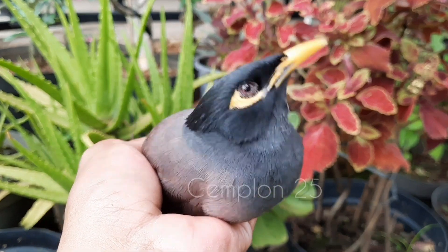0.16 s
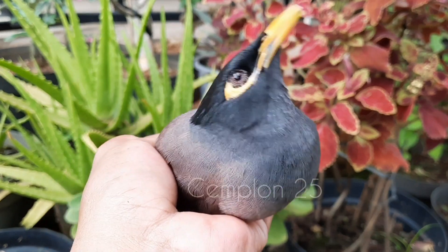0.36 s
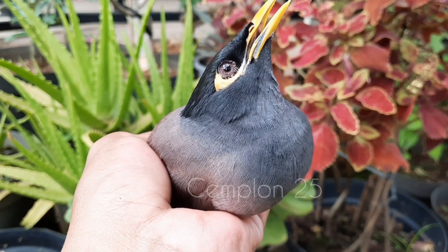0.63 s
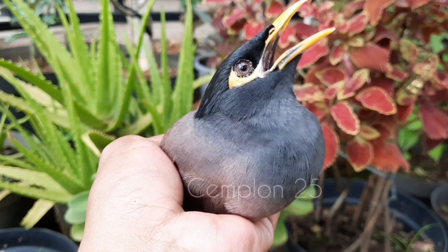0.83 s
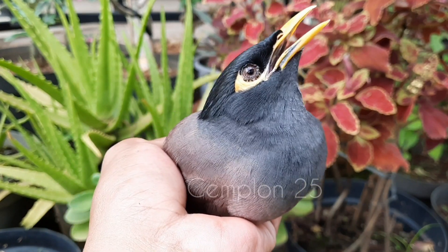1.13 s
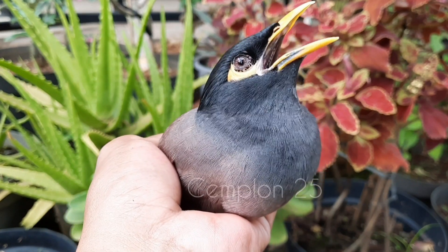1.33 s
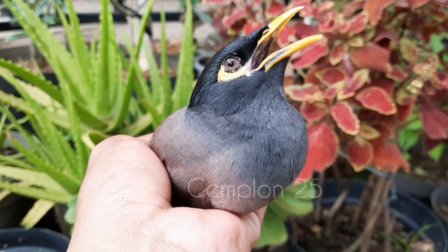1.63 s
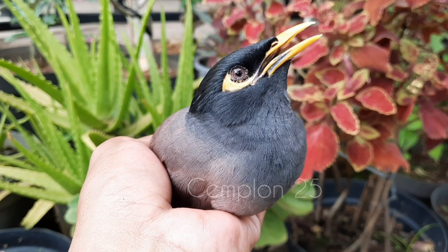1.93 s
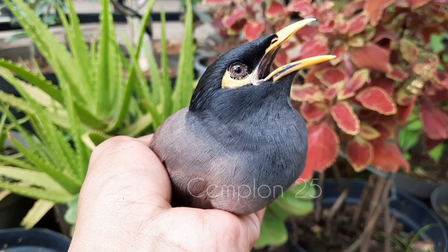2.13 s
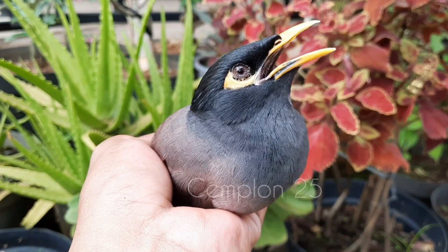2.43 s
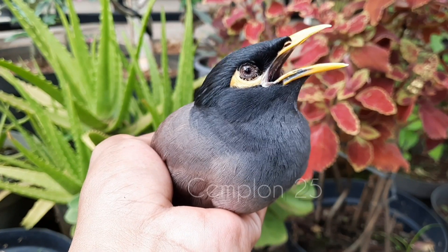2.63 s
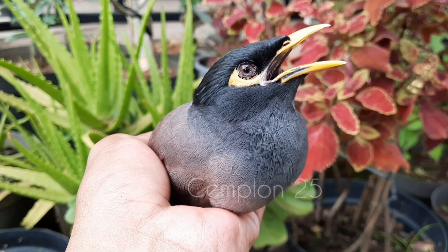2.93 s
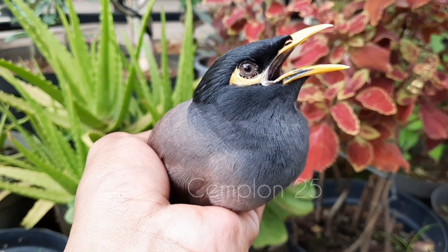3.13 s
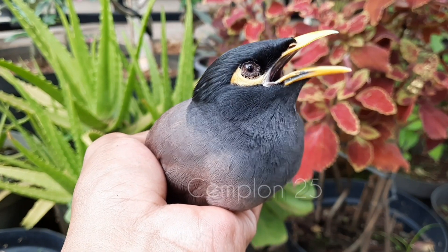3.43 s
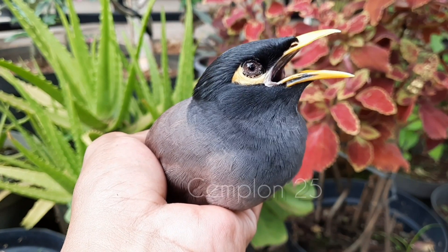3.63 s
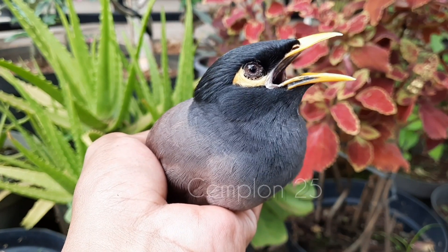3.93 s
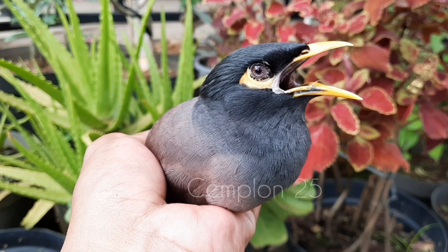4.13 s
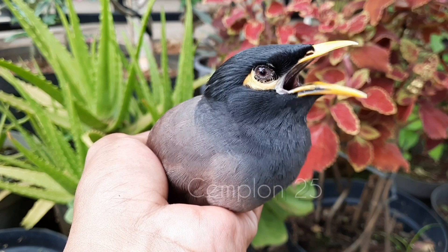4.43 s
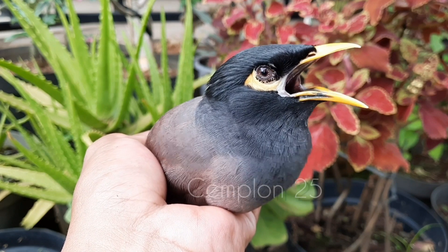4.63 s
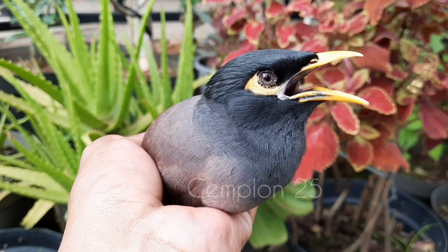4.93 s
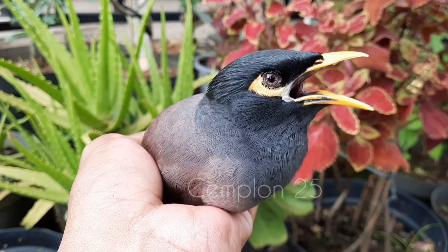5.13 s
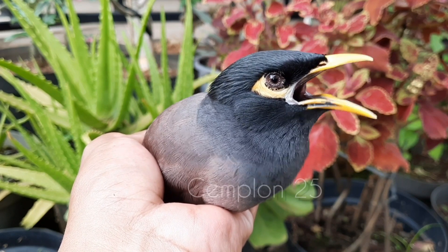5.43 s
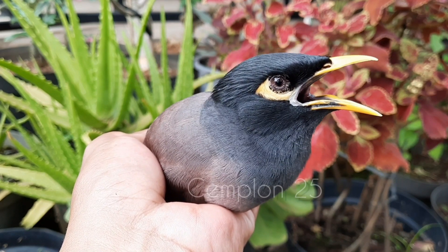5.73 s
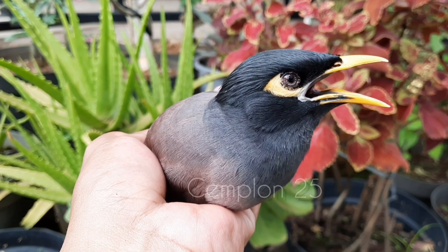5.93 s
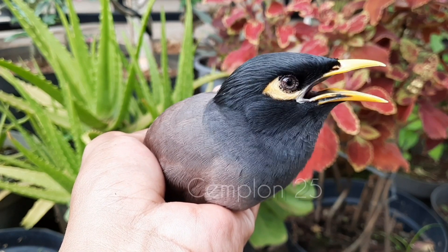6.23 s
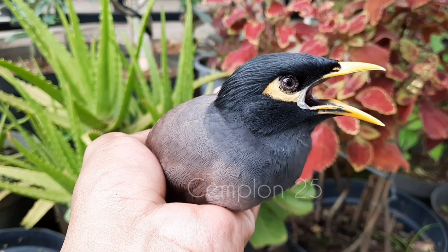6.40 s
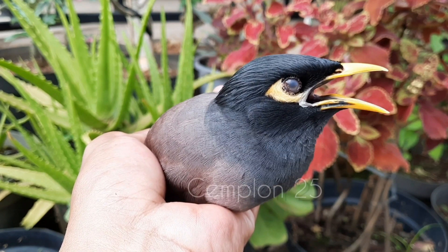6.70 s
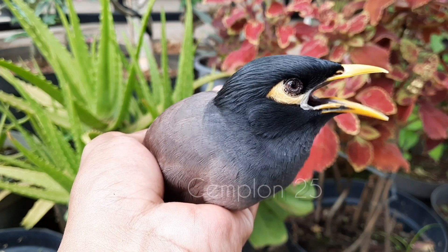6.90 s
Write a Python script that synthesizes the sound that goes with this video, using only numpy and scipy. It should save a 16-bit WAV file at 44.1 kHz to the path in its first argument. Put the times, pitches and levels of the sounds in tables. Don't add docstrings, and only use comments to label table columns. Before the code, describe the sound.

Hand-held myna performs a varied loud song of chirps, buzzy trills, clicking triples and hooked whistles, then a brief lull and sharp chatter outdoors.

```python
import sys
import numpy as np
from scipy import signal
from scipy.fft import rfft, irfft, next_fast_len
from scipy.io import wavfile
from scipy.ndimage import uniform_filter1d, minimum_filter1d, map_coordinates

SR = 44100
rng = np.random.default_rng(int(sys.argv[2]) if len(sys.argv) > 2 else 0)


def voltage_ratio(level):
    return 10 ** (np.asarray(level, float) / 20)


def to_wav(sig):
    pcm = np.clip(np.atleast_2d(sig), -1, 1) * 32767
    pcm = np.round(pcm).astype(np.int16)
    wavfile.write(sys.argv[1], SR, pcm.T)


N = 311346
TIME = np.arange(N) / SR


def curve(hz, points):
    points_hz, points_db = np.array(points, float).T
    return np.interp(np.log(np.maximum(hz, 1)), np.log(points_hz), points_db)


def colour(x, points):
    size = next_fast_len(N, True)
    gain = voltage_ratio(curve(np.fft.rfftfreq(size, 1 / SR), points))
    return irfft(rfft(x, size) * gain, size)[..., :N]


def causal(points, size=1024):
    cepstrum = irfft(np.log(voltage_ratio(curve(np.fft.rfftfreq(size, 1 / SR), points))))
    cepstrum[1:size // 2] *= 2
    cepstrum[size // 2 + 1:] = 0
    return irfft(np.exp(rfft(cepstrum)))[:size // 2]


def unit(x):
    return x / np.sqrt(np.mean(x ** 2) + 1e-30)


def wobble(count, hz, channels=()):
    slow = signal.butter(4, hz, fs=SR, output="sos")
    noise = rng.standard_normal((*channels, count + 400))
    return unit(signal.sosfilt(slow, noise)[..., 400:])


def add(track, s, sound):
    i = int(s * SR)
    track[i:i + len(sound)] += sound[:N - i]


# t/s, level/dB
GARDEN = [
    (0, -51),
    (.7, -54),
    (1.3, -58),
    (5.4, -62),
    (5.7, -76),
    (6.3, -68),
    (7.06, -59),
]
# f/Hz, level/dB
RUMBLE = [(15, -80.5), (25, -19), (91, -8.5), (172, -12), (226, -23), (318, -17.5), (692, -37.5),
          (1070, -41), (1200, -31), (1560, -60.5), (2640, -120)]
# f/Hz, level/dB
HISS = [(710, -41.5), (1200, -15), (2230, -11), (3740, -12.5), (5590, -12.5), (9820, -18.5), (12200, -14),
        (15300, -39), (16000, -34)]
HISS_DB, HISS_DUCK, HISS_RISE_S = -61, 1.25, .15


def garden():
    s, rumble_db = np.transpose(GARDEN)
    hiss_db = HISS_DB + HISS_DUCK * (rumble_db - rumble_db[0])
    middle, difference = colour(rng.standard_normal((2, N)), RUMBLE)
    low = middle + .65 * np.array([[1], [-1]]) * difference
    high = colour(rng.standard_normal((2, N)), HISS)
    rumble = unit(low) * voltage_ratio(np.interp(TIME, s, rumble_db) + 4.7 * wobble(N, 6.8))
    hiss = unit(high) * voltage_ratio(np.interp(TIME, s, hiss_db))
    return rumble + hiss * np.minimum(1, 0.1 + TIME / HISS_RISE_S)


# start t/s, end t/s, f/Hz, level/dB
ENGINES = [
    (0, 1.7, 90, -54),
    (1.8, 2.85, 92, -53),
    (0, .9, 165, -58),
    (2.8, 4.2, 168, -56),
    (3.45, 4.7, 80, -56),
    (.9, 2.6, 135, -62),
]


def engines():
    out = np.zeros((2, N))
    side = np.array([[1], [-1]])
    for start, end, hz, db in ENGINES:
        gate = np.clip(np.minimum(TIME - start + 0.058, end - TIME) / 0.023, 0, 1)
        swell = gate * voltage_ratio(db + 2 * wobble(N, 4))
        phase = 2 * np.pi * np.cumsum(hz * (1 + 0.058 * wobble(N, 3))) / SR
        out += swell * np.sin(phase + 0.084 * side)
    return out


# t/s, length/s, level/dB, centre f/Hz, bandwidth/Hz
PUFFS = [
    (0.141, 0.078, -39, 1820, 520),
    (0.736, 0.086, -39, 2100, 1070),
    (1.12, 0.091, -32.5, 4450, 2870),
    (1.511, 0.071, -35.5, 4600, 3150),
    (5.92, 0.038, -50, 2010, 1500),
    (6.171, 0.011, -29, 2440, 1980),
    (6.435, 0.017, -29, 2500, 2000),
]


def puffs():
    out = np.zeros(N)
    for s, length, db, hz, width in PUFFS:
        t = np.arange(int(1.8 * length * SR)) / SR
        band = [max(hz - width / 2, 300), hz + width / 2]
        air = signal.lfilter(*signal.butter(2, band, "band", fs=SR), rng.standard_normal(len(t)))
        add(out, s, voltage_ratio(db) * unit(air) * np.minimum(1, t / 0.0018) * np.exp(-(t / length) ** 2))
    return out


# t/s, peak level/dB
KNOCKS = [
    (0.302, -28.5),
    (1.397, -48.5),
    (1.799, -32.5),
    (4.398, -41),
    (4.639, -42),
    (4.867, -45.5),
    (5.09, -43),
    (5.322, -43.5),
]


def knocks():
    out = np.zeros(N)
    t = np.arange(1500) / SR
    for s, db in KNOCKS:
        add(out, s, voltage_ratio(db) * wobble(1500, 180) / 2 * np.sin(np.pi * t / t[-1]) ** 2)
    return out


# t/s, level/dB
TICKS = [
    (0.306, -38),
    (0.313, -15.5),
    (0.603, -33),
    (0.616, -36),
]
# f/Hz, level/dB
FEATHER = [(300, -14.5), (1200, -22), (2600, -4), (3800, -15.5), (5400, -1), (7000, -13.5), (11000, -8),
           (15500, -12.5)]


def ticks():
    out = np.zeros(N)
    t = np.arange(1500) / SR
    for s, db in TICKS:
        burst = rng.standard_normal(1500) * np.exp(-t / 0.0037)
        add(out, s, voltage_ratio(db) * np.convolve(burst, causal(FEATHER)))
    return out


# f/Hz, level/dB
TRACT = [(700, -19.5), (1780, -21), (2150, -17), (3000, -2), (3600, -7.5), (4300, -14), (6000, -14.5),
         (15000, -27.5)]
# f/Hz, level/dB
UPPER = [(3000, -67), (6000, 2.5), (9000, -6), (12000, -2.5), (15500, -1)]
BEAM_HZ, EFFORT_TILT = 4860, 0.04
WANDER, WANDER_HZ = .004, 50


def syllable(shape, stretch, pitch, facing_db, rough, second_db, third_db, flutter=None):
    s, hz, level_db = np.transpose(shape)
    t = np.arange(int((s[-1] * stretch + 0.0026) * SR)) / SR
    count = len(t)
    f0 = uniform_filter1d(np.interp(t, s * stretch, hz * pitch), 60)
    level_db = uniform_filter1d(np.interp(t, s * stretch, level_db), 60)

    membrane_db = enumerate((0, second_db, third_db), start=1)
    share = np.array([db + curve(k * f0, TRACT) for k, db in membrane_db])
    smooth = level_db + share - 10 * np.log10((voltage_ratio(share) ** 2).sum(axis=0))
    slide = np.minimum(1, abs(np.gradient(np.log(f0))) * SR / 60)

    pulse = 1
    if flutter:
        flutter_hz, peak_s, depth, swing, lasts, dies, hurry = flutter
        since = t - peak_s * stretch
        beat = 2 * np.pi * (flutter_hz + hurry * since) * since
        fade = np.clip((lasts - t / t[-1]) / dies, 0, 1)
        f0 = f0 * (1 + swing * fade * np.cos(beat + 0.3))
        pulse = 1 + depth * fade * (np.cos(beat) - .5)
    jitter = 0.14 * rough * wobble(count, 800) + WANDER * wobble(count, WANDER_HZ)
    phase = 2 * np.pi * np.cumsum(f0 * (1 + jitter)) / SR

    tone = 0
    waver, grain, slip, drift = (wobble(count, rate_hz, (13,)) for rate_hz in (390, 250, 700, 45))
    for k in range(1, 13):
        if k < 4:
            db = smooth[k - 1]
        else:
            db = smooth[2] + curve(k * f0, UPPER) - 4.7 * (k - 4)
        tilt_db = facing_db + EFFORT_TILT * (level_db - level_db.max())
        db = db + tilt_db * np.log2(np.maximum(1, k * f0 / BEAM_HZ))
        weak = np.clip((level_db - db - 6) / 20, 0, 1)
        shimmer = 1 + 0.1 * weak * waver[k]
        blur = .45 * weak * grain[k] + (k > 3) * 1.6 * slide * slip[k]
        patch = voltage_ratio(2.5 * (k > 2) * drift[k])
        audible = k * f0 < 16000
        tone = tone + voltage_ratio(db) * shimmer * patch * audible * np.sin(k * phase + k * k + blur)

    fray = 1 + rough * wobble(count, 130) + 0.11 * rough * wobble(count, 1200)
    hiss = np.diff(rng.standard_normal(count + 1))
    air = hiss * voltage_ratio(level_db - 13.0 + facing_db) * (slide ** 2 + 0.005)
    edge = np.minimum(1, np.minimum(t, t[-1] - t) / .001)
    return (np.sqrt(2) * tone * fray + air) * edge * pulse


def lead_in(notes, lead_s, stretch, db, step_db):
    return [(s - lead_s, stretch, 1, db + k * step_db) for k, (s, *_) in enumerate(notes)]


# t/s, f/Hz, level/dB
RISE = [(0, 1450, -46), (.012, 1750, -31), (.024, 2700, -21), (.032, 2700, -17), (.04, 5010, -22),
        (.073, 5020, -19), (.082, 3150, -8), (.088, 3400, -9), (.092, 1800, -22)]
# t/s, f/Hz, level/dB
LOW = [(0, 1290, -21), (.009, 1149, -32), (.022, 1250, -25.5), (.03, 1290, -34)]
# t/s, f/Hz, level/dB
TRILL = [(0, 1950, -30), (.012, 2250, -20), (.016, 2980, -7), (.021, 3060, -7), (.045, 3200, -9.5),
         (.063, 3200, -8.5), (.07, 3050, -8), (.083, 2880, -9), (.09, 2850, -32)]
# t/s, f/Hz, level/dB
FALL = [(0, 4670, -30), (.013, 2184, -18), (.045, 1948, -18.5), (.068, 1962, -21.5), (.077, 1760, -48)]
# t/s, f/Hz, level/dB
SWOOP = [(0, 1820, -28), (.014, 2330, -17), (.02, 3125, -2.5), (.026, 3510, -15.5), (.036, 4500, -23.5),
         (.058, 5070, -11), (.073, 4860, -20)]
# t/s, f/Hz, level/dB
RATTLE = [(0, 3500, -22), (.003, 2900, -5), (.012, 2500, -9), (.025, 2200, -13), (.07, 1950, -19),
          (.086, 1900, -36)]
# t/s, f/Hz, level/dB
WARBLE = [(0, 835, -53), (.02, 1120, -30), (.026, 1770, -18), (.036, 1774, -17.5), (.042, 1370, -18),
          (.047, 2194, -25), (.054, 2010, -20.5), (.062, 1348, -18), (.072, 1187, -34.5)]
# t/s, f/Hz, level/dB
PIPE = [(0, 2780, -15), (.003, 3108, -8), (.051, 3177, -7), (.058, 2360, -20), (.071, 2196, -25),
        (.081, 1824, -21), (.103, 1762, -20), (.128, 1806, -24), (.14, 1660, -43)]
# t/s, f/Hz, level/dB
HOOK = [(0, 950, -56), (.013, 1800, -32), (.022, 2120, -29), (.03, 1420, -30), (.037, 1340, -31),
        (.042, 2300, -26)]
# t/s, f/Hz, level/dB
WHISTLE = [(0, 2590, -14.5), (.011, 2650, -13), (.016, 2730, -6.5), (.031, 2790, -6), (.035, 2925, -8),
           (.09, 2985, -9.5), (.099, 3130, -12), (.103, 1900, -27), (.112, 1050, -42)]
# t/s, f/Hz, level/dB
TIRED = [(0, 2520, -18.5), (.022, 2640, -17.5), (.035, 2730, -13), (.042, 2800, -11), (.046, 2970, -10),
         (.083, 2950, -10), (.091, 3080, -13), (.097, 1886, -28), (.109, 908, -38)]
# t/s, f/Hz, level/dB
SIGH = [(0, 1214, -69), (.015, 1610, -60), (.03, 1900, -55), (.04, 1790, -64)]
# t/s, f/Hz, level/dB
ARCH = [(0, 714.5, -55.5), (.032, 1207, -22.5), (.036, 1620, -17), (.057, 1796, -17), (.077, 1856, -21),
        (.102, 1678, -16), (.139, 1091, -26.5), (.147, 720, -42.5), (.158, 432, -59)]
# t/s, f/Hz, level/dB
CHIP = [(0, 1555, -51), (.004, 1380, -31.5), (.01, 1520, -24.5), (.018, 1550, -52)]
# t/s, f/Hz, level/dB
TUMBLE = [(0, 2790, -24), (.006, 2660, -18), (.014, 2734, -24.5), (.018, 2515, -15.5), (.042, 2417, -17),
          (.05, 2220, -26.5), (.062, 1970, -25)]
# t/s, f/Hz, level/dB
DIP = [(0, 1524, -27), (.01, 1262, -26), (.018, 1615, -16), (.03, 1542, -25.5)]
# t/s, f/Hz, level/dB
SLIDE = [(0, 3900, -39), (.003, 3210, -13), (.014, 2444, -18), (.042, 2050, -23.5), (.062, 1860, -28.5),
         (.069, 1803, -51)]
# t/s, f/Hz, level/dB
PEEP = [(0, 3530, -22), (.011, 4200, -4.5), (.014, 4470, -26.5), (.016, 5200, -18), (.022, 4650, -8.5)]
# t/s, f/Hz, level/dB
MURMUR = [(0, 1292, -54), (.03, 1237, -53), (.15, 1220, -53), (.25, 1230, -63)]
# t/s, f/Hz, level/dB
DRONE = [(0, 1095, -80), (.06, 1396, -60), (.13, 1720, -47)]
# t/s, f/Hz, level/dB
HUM = [(0, 1730, -52), (.02, 1830, -41), (.17, 1900, -43)]
# t/s, stretch, pitch factor, level/dB, extra level/dB on the high plateau
RISE_AT = [
    (.769, 1, 1, 1, 8),
    (1.187, 1, .957, 0, 0),
    (1.598, 1, .985, 0, 2),
    (2.021, 1, .975, 0, -3),
]
# t/s, stretch, pitch factor, level/dB
LOW_AT = [
    (0.864, 0.99, 0.97, 2.5),
    (1.283, 0.84, 0.99, 2.5),
    (1.689, 1.3, 1.0, 4),
    (2.116, 1.05, 1, 1.5),
]
# t/s, stretch, pitch factor, level/dB
TRILL_AT = [
    (0.894, 1, 1, 0),
    (1.316, 1, .99, 1),
    (2.15, 1.134, 1, 0),
]
# t/s, stretch, pitch factor, level/dB
FALL_AT = [
    (0.99, 0.92, 1.02, -0.24),
    (1.41, 0.96, 1.037, -0.035),
    (2.254, 0.99, 1.04, -1.5),
]
# t/s, stretch, pitch factor, level/dB
PIPE_AT = [
    (2.697, 0.97, 0.987, -0.84),
    (3.159, 1.0, 0.99, -1.5),
    (3.635, 1.027, 0.99, 1.0),
]
# t/s, stretch, pitch factor, level/dB, lateness/s of the step up in pitch
WHISTLE_AT = [
    (4.085, 0.96, 1, 1, .011),
    (4.302, 1.044, .99, 0.5, 0),
    (4.526, 1.074, .995, -0.5, -0.012),
    (4.763, 1.02, 1, -1.5, -0.008),
    (4.992, 0.94, 1.012, 0, -.007),
    (5.22, 0.93, 1.01, -0.5, -0.011),
]
# t/s, stretch, pitch factor, level/dB
TIRED_AT = [
    (5.485, 1, 1, 0),
]
# t/s, stretch, pitch factor, level/dB
ARCH_AT = [
    (6.022, 1.02, 1.0, 0.013),
    (6.284, 1.098, 1.02, 0.0),
]
# f/Hz, first peak t/s, depth, pitch swing share, share it lasts, share it dies over, speed-up/(Hz/s)
TRILL_FLUTTER = (80, 0.0195, 0.48, -0.012, 0.76, .08, 200)
RATTLE_FLUTTER = (128, .004, .45, .24, 1.3, .36, 0)
# gesture, times, roughness 0-1, second and third partial at the membrane level/dB, any flutter
SONG = [(RISE, RISE_AT, 0.12, -6.5, -17), (LOW, LOW_AT, 0.056, 7.4, -18.5),
        (TRILL, TRILL_AT, 0.078, -6, -7.5, TRILL_FLUTTER), (FALL, FALL_AT, 0.061, -14, -19.5),
        (SWOOP, [(1.733, 1, 0.96, 0)], 0.087, 0, -5), (RATTLE, [(1.807, 0.9, 0.92, 0.0067)],
        0.17, -27, -25.5, RATTLE_FLUTTER), (WARBLE, lead_in(PIPE_AT, 0.074, 1.0, 1.0, 1.6),
        0.13, -0.73, -9.5), (PIPE, PIPE_AT, 0.0096, -6, -13.5),
        (HOOK, lead_in(WHISTLE_AT + TIRED_AT, 0.039, 0.91, 10.6, -0.84), 0.13, -4.5, -8.5),
        (WHISTLE, WHISTLE_AT, .02, -9.5, -10.5), (TIRED, TIRED_AT, 0.015, -11.5, -14),
        (SIGH, [(5.925, .7, 1, 0), (5.948, 1, 0.97, 0)], 0.18, -11.5, -40), (ARCH, ARCH_AT, 0.059, 1, -6.5),
        (CHIP, [(6.578, 1, 0.99, 0)], 0.054, -6.5, -21), (TUMBLE, [(6.598, 0.99, 1, 0.018)],
        0.057, -15, -19), (DIP, [(6.665, 1, 1, 0)], .05, -4.5, -11), (SLIDE, [(6.697, 0.99, 1, 0)],
        0.058, -12.5, -17), (PEEP, [(7.037, 0.9, 1, 0.0037)], 0.21, -12.5, -48),
        (MURMUR, [(1.9, 0.9, 1, 0.012)], 0.27, -26, -69), (DRONE, [(6.47, 1, 0.97, 0.0053)],
        0.29, -34, -48), (HUM, [(6.8, 1, 1, 0)], 0.2, -34, -44)]
# t/s, slope above BEAM_HZ/(dB per octave)
FACING = [
    (.7, -2),
    (2.5, 2),
    (4.2, 4.5),
    (5.2, 1.5),
    (7, 8.5),
]


def song():
    out = np.zeros(N)
    rises = SONG[0]
    for entry in SONG:
        shape, times, *voice = entry
        for s, stretch, pitch, db, *own in times:
            late, lean_db = (0, sum(own)) if entry is rises else (sum(own), 0)
            moved = []
            for at, hz, level_db in shape:
                shift = late * (.025 < at < .05)
                moved.append((at + shift, hz, level_db + lean_db * (hz > 4500)))
            facing_db = np.interp(s, *np.transpose(FACING))
            add(out, s, voltage_ratio(db) * syllable(moved, stretch, pitch, facing_db, *voice))
    return out


# t/s, gap/s, peak level/dB
TRIPLES = [
    (2.4499, 0.036, -6.5),
    (2.918, 0.036, -5.5),
    (3.3917, .0368, -4),
    (3.868, 0.0369, -2.5),
]
# level/dB, length/ms
BUILD = [
    (-1, 2),
    (1.7, 6.2),
    (3, 6),
]
# t/s, peak level/dB, length/ms
SNAPS = [(s + k * gap, db + step_db, ms) for s, gap, db in TRIPLES for k, (step_db, ms) in enumerate(BUILD)]
# t/s, peak level/dB, length/ms
LAZY_SNAPS = [
    (5.8355, -20, 1),
    (5.855, -14.5, 1.2),
    (5.873, -15, 1.8),
    (5.889, -13, 2.1),
    (5.9135, -17, 7),
]
# t/s, peak level/dB, length/ms
DEEP_SNAPS = [
    (6.863, -5.5, 1.2),
    (6.919, -3.5, 4.8),
    (6.972, -5.5, 4.76),
]
# snaps, slip rate f/Hz, open-throat resonance f/Hz, its level/dB
SNAP_RUNS = [
    (SNAPS, 700, 700, 1),
    (LAZY_SNAPS, 330, 500, 10),
    (DEEP_SNAPS, 900, 900, 15),
]
# f/Hz, level/dB
THROAT = [(200, -40.5), (450, -24.5), (900, -32), (1430, -18.5), (2210, -23.5), (2700, -8.5), (3100, -5),
          (3700, -8.5), (5250, -26.5), (6740, -16), (9090, -37.5), (10900, -25), (16000, -43.5)]


def snaps():
    out = np.zeros(N)
    for run, rate_hz, open_hz, open_db in SNAP_RUNS:
        opened = []
        for hz, db in THROAT:
            opened.append((hz, db + open_db * np.exp(-(np.log(hz / open_hz) / 0.23) ** 2)))
        throat = causal(opened)
        for s, db, ms in run:
            spacing, strength = rng.standard_normal((2, 24))
            at = np.cumsum(np.exp(0.23 * spacing)) / rate_hz
            at = at - at[0]
            after = at - ms / 1000
            fade = np.where(after < 0, 1, 0.48 * np.exp(-after / 0.0038))
            size = voltage_ratio(0.5 * strength - 140 * at) * fade
            slips = np.zeros(4096)
            np.add.at(slips, np.clip(at * SR, 0, 4095).astype(int), size)
            ring = np.convolve(slips, throat)
            add(out, s - .0004, voltage_ratio(db) * ring / abs(ring).max())
    return out


EARLY_DB, EARLY_T60_S = -25, .06
WALLS_DB, WALLS_T60_S = -31.5, 0.32


def walls(x):
    t = np.arange(int(.5 * SR)) / SR
    early = voltage_ratio(EARLY_DB) * unit(np.exp(-np.log(1000) * t / EARLY_T60_S) * (t > .002))
    late = voltage_ratio(WALLS_DB) * unit(np.exp(-np.log(1000) * t / WALLS_T60_S) * (t > .015))
    echo = rng.standard_normal((2, len(t))) * (early + late) / np.sqrt(len(t))
    wet = signal.fftconvolve(x[None], echo)[:, :N]
    return colour(wet, [(300, 5), (1500, 13.5), (4000, 5.5), (9000, 10), (16000, 0.5)])


# t/s, lag/samples
PORT_LAG = [
    (0, 5.23),
    (4, 3.96),
    (5.5, 2.15),
    (7.06, 2.82),
]
# f/Hz, left minus right level/dB, left lead beyond the lag/rad
PORTS = [(200, 0, 0), (700, 1.5, -.1), (1290, 8, .6), (1750, 4.5, -.1), (2330, -1, -1.2), (3190, -2, -1),
         (3700, -2, -.2), (5000, -1, -.1), (8870, 2, -1.5), (15000, 2.5, -2.5)]


def scene():
    bird = song() + snaps() + puffs() + knocks() + ticks()
    hz, tilt_db, lead = np.transpose(PORTS)
    lag = np.interp(TIME, *np.transpose(PORT_LAG))
    late = map_coordinates(bird, [np.arange(N) - lag], order=3)
    turn = np.exp(-1j * curve(np.fft.rfftfreq(N, 1 / SR), np.transpose([hz, lead])))
    left = colour(bird, np.transpose([hz, tilt_db / 2]))
    right = colour(irfft(rfft(late) * turn, N), np.transpose([hz, -tilt_db / 2]))
    return np.array([left, right]) + walls(bird) + garden() + engines()


def top_cut(x):
    return signal.sosfilt(signal.butter(12, 16790, fs=SR, output="sos"), x)


LIMIT_DB, LIMIT_RATIO = -3.5, 4.0


def record(dry):
    peak = -minimum_filter1d(-abs(dry).max(0), 301)
    gain = np.minimum(1, voltage_ratio(LIMIT_DB) / (peak + 1e-9)) ** (1 - 1 / LIMIT_RATIO)
    heard = colour(dry, [(28, -9), (50, 0), (15700, 0), (16300, -22), (16900, -60)])
    return top_cut(heard * uniform_filter1d(gain, 301))


dry = scene()
out = record(dry)
to_wav(out)
```